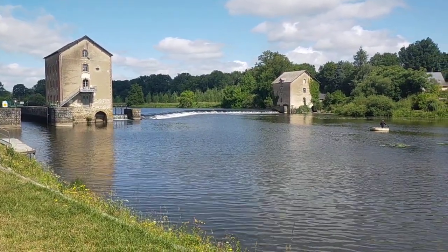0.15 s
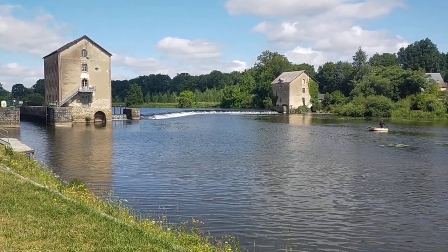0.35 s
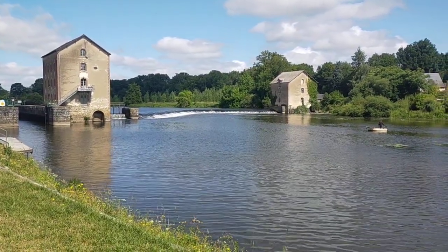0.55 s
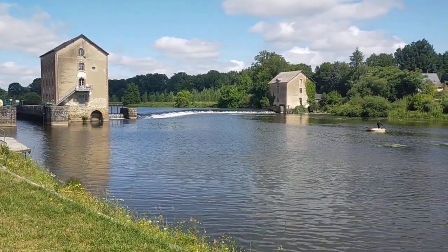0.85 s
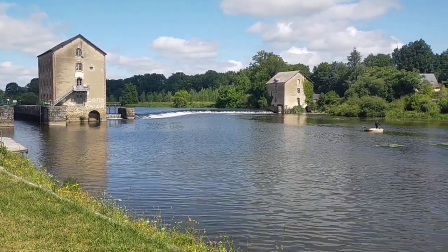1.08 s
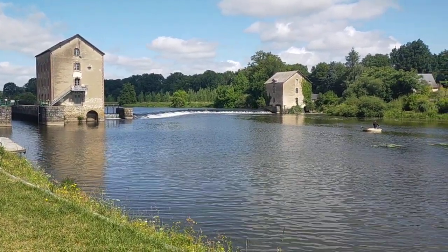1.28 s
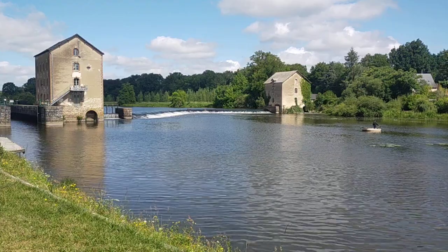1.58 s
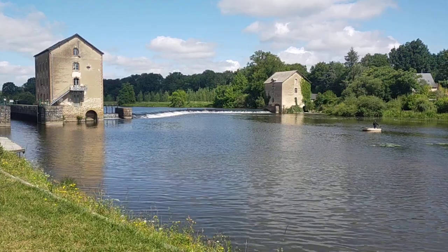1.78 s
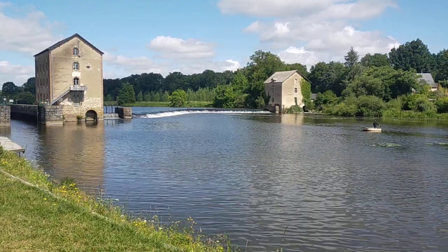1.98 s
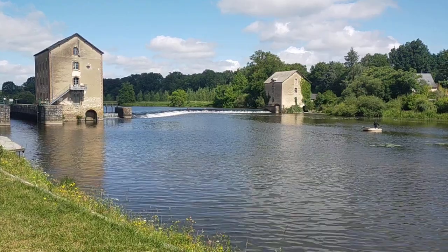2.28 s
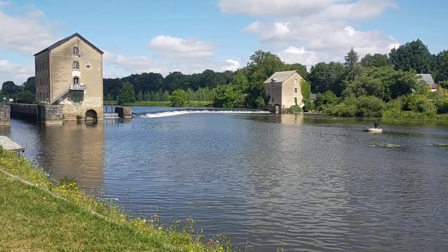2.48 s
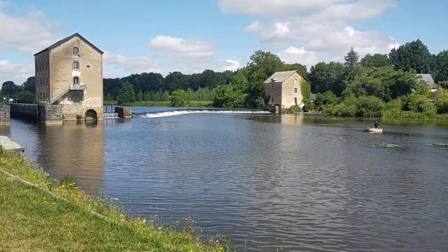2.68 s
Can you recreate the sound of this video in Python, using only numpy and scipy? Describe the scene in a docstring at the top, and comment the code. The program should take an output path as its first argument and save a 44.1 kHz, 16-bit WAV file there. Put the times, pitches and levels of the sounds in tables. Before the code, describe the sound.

Wind batters an unprotected microphone in rough, crackling bursts with low thuds and sharp slaps, easing between gusts; small high birds chirp and a distant weir rushes softly across an open riverbank.

```python
"""A riverbank on a breezy day. Wind rumbles on the microphone as filtered noise; rough noise bursts buffet it,
with thuds and sharp slaps made from single pressure pushes. Now and then wavering sine tones
sound like hollow notes blown across its port. A distant weir rushes steadily as filtered noise,
and small birds, made of gliding sine tones with an echo, sing falling notes and thin, wavy calls."""
import sys
import numpy as np
from scipy import signal
from scipy.fft import rfft, irfft
from scipy.io import wavfile
from scipy.ndimage import uniform_filter1d

SR = 44100
rng = np.random.default_rng(int(sys.argv[2]) if len(sys.argv) > 2 else 0)


def wav_record(signal):
    """Record a signal, one row per channel, as 16-bit PCM in the file named by sys.argv[1]."""
    frames = np.transpose(np.atleast_2d(signal))
    bounded = np.clip(frames, -1, 1)
    # unit amplitude maps onto the largest positive 16-bit level
    quanta = np.round(bounded * 32767).astype(np.int16)
    wavfile.write(sys.argv[1], SR, quanta)


N = 125685  # length in samples

# All levels in the wind tables are before the shared WIND_DB boost.
# Colour tables give the balance of a noise; its loudness is set elsewhere.

# Strength of the breeze. Each row: time in seconds, rumble level in dB.
BREEZE = [(0.0, -41.5), (0.402, -21), (0.462, -38.5), (0.51, -18), (0.63, -28.5), (0.65, -34.5),
          (0.84, -33.5), (1.09, -23), (1.4, -33.5), (1.59, -25.5), (2.21, -25), (2.25, -32.5),
          (2.48, -20.5), (2.65, -41), (2.85, -40.5)]
# Colour of the wind rumble. Each row: frequency in Hz, relative level in dB.
RUMBLE_COLOUR = [(8, -29.5), (18, 1.5), (70, -2), (120, -7.5), (180, -11), (275, -21), (420, -30),
                 (1500, -100)]
# Steadiness runs from 0 (natural swings) to 1 (evened out); the eddy life is in seconds.
RUMBLE_STEADY, RUMBLE_EDDY_S = 0.79, 0.13

# Colour of the distant falling water. Each row: frequency in Hz, relative level in dB.
WEIR_COLOUR = [(200, -13), (380, -10.5), (520, 1), (1000, -2), (1400, -5.5), (2050, -3.5), (2700, -11.5),
               (3300, -21.5), (3800, -26), (6200, -25.5), (7600, -32), (8900, -41.5), (10300, -38.5),
               (15500, -44.5)]
WEIR_DB = -45

# Shapes of the bird notes, in even steps through the note.
# Each row: pitch in Hz, level in dB added to the level of the note.
# A slur that rises, then falls.
SLUR = [(4980, -26), (5750, -7), (6350, -37), (5900, -9.5), (5400, -3), (4950, 1.5), (4680, -9), (4370, -3),
        (4140, -8)]
# A longer call that drops, then stays nearly level. Each row: pitch in Hz, added level in dB.
SEEP = [(8200, -14), (6430, -2.5), (5770, 5.5), (5800, 1.5), (5970, 2.5), (5960, -21.5), (6150, 3),
        (6100, -11.5)]
# A short falling chip. Each row: pitch in Hz, added level in dB.
CHIP = [(5480, -18), (5230, -2), (5000, -14), (4700, -1), (4500, 0), (4250, -12)]
# A call that dips and climbs back. Each row: pitch in Hz, added level in dB.
WAVE = [(7850, -1), (7450, -7), (6740, -9.5), (6040, 5), (6700, -6.5), (7440, -10), (7760, -5), (7720, -2),
        (7500, -9)]
# A steadily falling note. Each row: pitch in Hz, added level in dB.
TUMBLE = [(5950, -6), (5600, -12.5), (5120, -2), (4960, 0.5), (4750, -13.5), (4440, -0.5), (4100, -14)]
# A call that rises, dips and rises again. Each row: pitch in Hz, added level in dB.
DIP = [(6200, 3), (7800, 3.5), (7050, -4), (6640, 3.5), (7100, -8), (7400, -8), (7750, -3.5), (7900, -3),
       (7800, -2), (7600, -2)]
# A call that rises and falls. Each row: pitch in Hz, added level in dB.
ARCH = [(6480, 6), (7200, -7), (8400, -1), (8200, -3), (7540, -8), (7050, -2)]
# Notes of the nearer birds. Each row: start in seconds, length in seconds, level in dB, shape.
SONG = [(.004, .064, -49.5, SLUR), (0.104, 0.059, -52, SLUR), (0.2, 0.062, -50, SLUR),
        (0.294, .066, -51.5, SLUR), (0.662, 0.13, -60, SEEP), (1.141, 0.015, -56, CHIP),
        (1.207, 0.098, -58.5, WAVE), (1.36, 0.044, -49, TUMBLE), (1.46, 0.12, -62, WAVE),
        (1.621, 0.053, -49, TUMBLE), (1.718, 0.12, -63, DIP), (2.389, .055, -61.5, ARCH),
        (2.637, 0.026, -53, CHIP), (2.727, 0.024, -52, CHIP), (2.815, 0.022, -49, CHIP)]
# Plain whistles of birds farther off.
# Each row: start in seconds, length in seconds, first pitch in Hz, last pitch in Hz, level in dB.
FAR_NOTES = [(0.87, 0.05, 3970, 3770, -69.5), (1.066, 0.05, 4400, 4340, -53),
             (1.812, .035, 3160, 3210, -63.5), (1.99, 0.041, 3430, 3520, -65),
             (2.168, 0.037, 3380, 3540, -62), (2.163, 0.056, 2450, 2580, -55),
             (2.497, .08, 4380, 4100, -68.5), (2.624, .02, 4800, 4650, -64), (2.749, .017, 4850, 4460, -60)]
BIRD_WAVER = .008  # typical pitch drift, as a share of the pitch
BIRD_FLUTTER_DB, FAR_FLUTTER_DB = 2.5, 3  # typical level changes
ECHO_DB, ECHO_T60_S = -9.5, 0.49  # echo level, seconds for it to fall by 60 dB

# Eddies that hit the microphone. Each row: start in seconds (middle of the rise),
# seconds from there to the release, body level in dB, tearing treble level in dB.
# The two levels are before BUFFET_DB and TEAR_DB.
BUFFETS = [ (0.202, 0.02, -37, -57), (0.291, 0.029, -22.5, -28), (0.314, 0.033, -23, -32.5),
           (0.396, 0.0062, -20.5, -34), (0.506, 0.018, -23, -36), (0.526, 0.032, -21, -25.5),
           (0.56, 0.048, -24.5, -35.5), (0.614, 0.0041, -20.5, -40), (0.921, 0.0038, -15.5, -34),
           (1.069, 0.03, -34, -27.5), (1.093, 0.05, -18, -24), (1.135, 0.059, -24, -36.5),
           (1.205, 0.029, -26.5, -37), (1.244, 0.019, -25, -36), (1.422, 0.083, -36.5, -47),
           (1.553, 0.017, -23.5, -40), (1.587, 0.016, -24.5, -29), (1.598, 0.041, -26.5, -32.5),
           (1.656, 0.054, -20, -24.5), (1.719, 0.027, -30.5, -37), (1.788, 0.014, -24.5, -38.5),
           (1.818, 0.021, -25, -42), (1.877, 0.024, -22, -32), (1.954, 0.014, -22.5, -35),
           (1.969, 0.019, -23, -31.5), (2.004, 0.04, -24, -47), (2.037, 0.0083, -19.5, -32),
           (2.057, 0.1, -31, -44.5), (2.179, 0.051, -33, -50.5), (2.431, 0.0085, -19, -32.5),
           (2.451, 0.035, -25, -34.5), (2.481, 0.052, -35.5, -48)]
# Colour of the body of a buffet. Each row: frequency in Hz, relative level in dB.
BUFFET_COLOUR = [(40, -2.5), (110, -1), (300, 2.5), (560, -0.5), (750, -12), (1000, -25), (1600, -46),
                 (4000, -91)]
# Colour of the torn upper edge. Each row: frequency in Hz, relative level in dB.
TEAR_COLOUR = [(300, -14), (600, -1), (850, 1.5), (1100, -0.5), (1450, -11), (2050, -18.5), (3000, -31),
               (4200, -53), (8000, -83.5)]
BUFFET_DB, TEAR_DB = 1.5, -1.5
BUFFET_STEADY, BUFFET_EDDY_S = 1, 0.036
FLUTTER_PER_S, FLUTTER_DB = 410, 2  # turns a second, typical level change
CRACKLE_PER_S, CRACKLE_DB = 860, 7  # turns a second, largest level change
ATTACK_S, RELEASE_S = 0.0084, 0.0089

# Hollow notes blown across the port. Each row: start in seconds (middle of the rise),
# seconds from there to the release, middle pitch in Hz, level in dB.
PORT_NOTES = [(0.246, 0.0088, 480, -30), (0.327, 0.0063, 625.6, -20), (0.591, 0.06, 520, -38),
              (0.978, 0.01, 560, -37), (1.013, 0.02, 504, -27), (1.05, 0.0092, 530, -21.5),
              (1.064, 0.021, 482.4, -17), (1.23, 0.021, 500, -26), (1.426, 0.11, 485, -32),
              (1.625, 0.034, 500, -26.5), (1.881, 0.028, 501, -21.5)]
# Typical pitch change as a share of the pitch, its turns a second, typical level change in dB.
PORT_WOBBLE, PORT_WOBBLE_PER_S, PORT_FLUTTER_DB = 0.116, 300, 1

# Sharp slaps where a small eddy snaps across the port; the narrowest crack.
# Each row: time in seconds, push level in dB, width in seconds.
SLAPS = [(.301, -19, 0.00023), (.329, -10.5, 0.00028), (.399, -9, 0.0004), (.542, -14.5, 0.00019),
         (1.104, -11.5, .00022), (1.128, -6, 0.00085), (1.249, -9.5, 0.00071), (1.665, -13, 0.00026),
         (1.698, -11, 0.00031), (1.709, -20, 0.00046), (1.883, -4, 0.0006), (1.973, -10, 0.00032),
         (2.042, -9, 0.00043), (2.431, -4, 0.00051)]
# Large eddies that thud on the microphone. Each row: time in seconds, push level in dB.
THUDS = [(0.383, -28), (.515, -9), (.541, -10), (1.014, -13.5), (1.122, -9), (1.602, -13), (1.655, -11),
         (1.786, -12), (1.86, -14), (1.965, -11)]
THUD_S = 0.0046  # width of a thud
PUSH_REBOUND = 0.41  # strength of the suck back, as a share of the push

WIND_DB = 1
GAIN_KNEE_DB, GAIN_RECOVERY_S = -14, 0.035
TOP_HZ = 15650


def undb(db):
    """Turn decibels into gain."""
    return 10 ** (np.asarray(db) / 20)


def seconds():
    """Give the time of every sample."""
    return np.arange(N) / SR


def unit(x):
    """Scale to an average (rms) strength of 1."""
    return x / np.sqrt(np.mean(x ** 2))


def walk(rate):
    """Wander smoothly by chance, with about `rate` turns a second and a spread of 1."""
    f = np.arange(N // 2 + 1) * SR / N
    slow_only = np.exp(-(2 * f / rate) ** 2)
    return unit(irfft(rfft(rng.standard_normal(N)) * slow_only, N))


def tint(x, colour):
    """Filter by a colour table, in straight lines over log frequency, and scale to rms 1."""
    hz, db = np.array(colour, float).T
    f = np.maximum(np.arange(N // 2 + 1) * SR / N, 1)
    gain = undb(np.interp(np.log(f), np.log(hz), db))
    return unit(irfft(rfft(x) * gain, N))


def turbulence(colour, eddy_s, steady):
    """Make pressure swings whose strength stays fairly even over the life of an eddy."""
    x = tint(rng.standard_normal(N), colour)
    size = max(int(eddy_s * SR), 2)
    power = uniform_filter1d(uniform_filter1d(x ** 2, size), size // 2)
    return unit(x / (power + 1e-9) ** (np.clip(steady, 0, 1) / 2))


def puff(start, hold):
    """Rise quickly around the start, hold, then die away exponentially."""
    t = seconds() - start
    rise = np.clip(t / ATTACK_S + .5, 0, 1)
    return rise * np.exp(-np.maximum(t - hold, 0) / RELEASE_S)


def rumble():
    """Large slow eddies press on the microphone as the breeze rises and falls."""
    at, db = np.array(BREEZE).T
    pressure = turbulence(RUMBLE_COLOUR, RUMBLE_EDDY_S, RUMBLE_STEADY)
    return pressure * undb(np.interp(seconds(), at, db))


def weir():
    """Falling water far across the river: countless splashes merge into one smooth rush."""
    return tint(rng.standard_normal(N), WEIR_COLOUR) * undb(WEIR_DB)


def birds():
    """Pure gliding whistles that waver and flutter, with a soft echo from trees and water."""
    t, out = seconds(), np.zeros(N)
    waver = 1 + BIRD_WAVER * walk(300)
    flutter = walk(200)
    notes = [(*note, BIRD_FLUTTER_DB) for note in SONG]
    for start, length, from_hz, to_hz, db in FAR_NOTES:
        plain = [(from_hz, 0), (to_hz, 0)]
        notes.append((start, length, db, plain, FAR_FLUTTER_DB))
    for start, length, db, shape, flutter_db in notes:
        hz, shape_db = np.array(shape, float).T
        at = np.linspace(0, 1, len(hz))
        u = (t - start) / length  # runs from 0 to 1 through the note
        on = (u > 0) & (u < 1)
        u = u[on]
        phase = 2 * np.pi * np.cumsum(np.interp(u, at, hz) * waver[on]) / SR
        level = undb(db + np.interp(u, at, shape_db) + flutter_db * flutter[on])
        fade = np.minimum(20 * np.minimum(u, 1 - u), 1)  # soft first and last twentieth
        out[on] += np.sqrt(2) * np.sin(phase) * level * fade
    echo = rng.standard_normal(N) * np.exp(-np.log(1000) * t / ECHO_T60_S)
    echo /= np.linalg.norm(echo)
    return out + undb(ECHO_DB) * signal.fftconvolve(out, echo)[:N]


def buffets():
    """The flow breaks up at the port: a fluttering blow with a torn, crackling upper edge."""
    body, tear = np.zeros(N), np.zeros(N)
    for start, hold, db, tear_db in BUFFETS:
        shape = puff(start, hold)
        # where buffets overlap, the stronger one wins
        body = np.maximum(body, shape * undb(db))
        tear = np.maximum(tear, shape * undb(tear_db))
    flutter = undb(FLUTTER_DB * walk(FLUTTER_PER_S))
    low = unit(turbulence(BUFFET_COLOUR, BUFFET_EDDY_S, BUFFET_STEADY) * flutter)
    crackle = undb(CRACKLE_DB * np.tanh(walk(CRACKLE_PER_S) - 1))
    high = tint(rng.standard_normal(N) * crackle, TEAR_COLOUR)
    return undb(BUFFET_DB) * body * low + undb(TEAR_DB) * tear * high


def port_notes():
    """Vortices shed at the edge of the port sound a brief unsteady note."""
    # time that runs unevenly, so every pitch wobbles
    uneven_s = np.cumsum(1 + PORT_WOBBLE * walk(PORT_WOBBLE_PER_S)) / SR
    notes = np.zeros(N)
    for start, hold, hz, db in PORT_NOTES:
        notes += undb(db) * puff(start, hold) * np.sin(2 * np.pi * hz * uneven_s)
    flutter = unit(undb(PORT_FLUTTER_DB * walk(PORT_WOBBLE_PER_S)))
    return np.sqrt(2) * notes * flutter


def push(at, db, width_s):
    """An eddy pushes on the microphone, then sucks back as it leaves."""
    u = (seconds() - at) / width_s
    suck = PUSH_REBOUND * np.exp(-(u / 2 - 1) ** 2)
    return undb(db) * (np.exp(-u ** 2) - suck)


def slaps():
    """Small eddies snap across the port, each a very short push and suck."""
    return sum(push(at, db, width_s) for at, db, width_s in SLAPS)


def thuds():
    """Large eddies thud on the microphone, each a longer push and suck."""
    return sum(push(at, db, THUD_S) for at, db in THUDS)


def scene():
    """Wind at the microphone over the weir and the birds."""
    wind = rumble() + buffets() + port_notes() + slaps() + thuds()
    return (undb(WIND_DB) * wind + weir() + birds())[None]


def record(dry):
    """The gain control ducks gently after strong gusts; the recorder cuts the top."""
    keep = np.exp(-1 / (GAIN_RECOVERY_S * SR))
    power = signal.lfilter([1 - keep], [1, -keep], dry ** 2)  # recent average power
    ducked = dry / np.sqrt(1 + power / undb(GAIN_KNEE_DB) ** 2)
    top_cut = signal.ellip(10, .2, 70, TOP_HZ, fs=SR, output="sos")
    return signal.sosfilt(top_cut, ducked)


dry = scene()
out = record(dry)
wav_record(out)
```